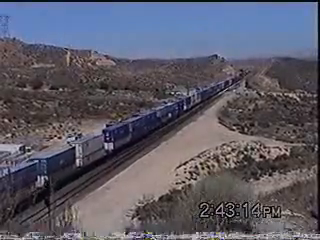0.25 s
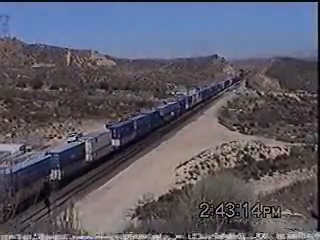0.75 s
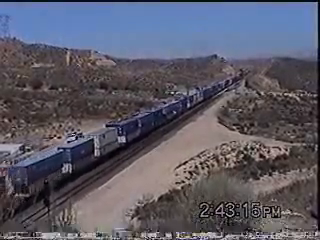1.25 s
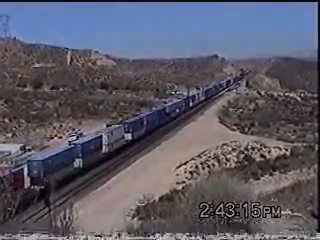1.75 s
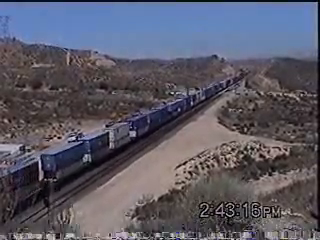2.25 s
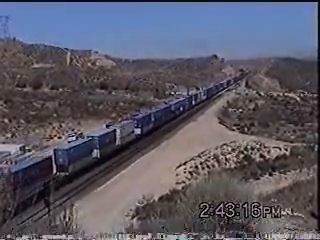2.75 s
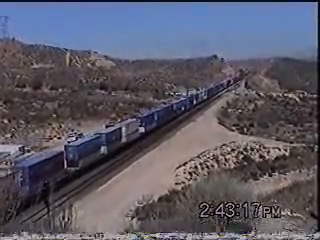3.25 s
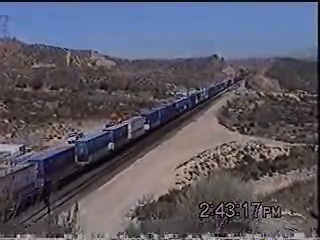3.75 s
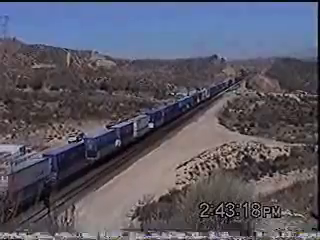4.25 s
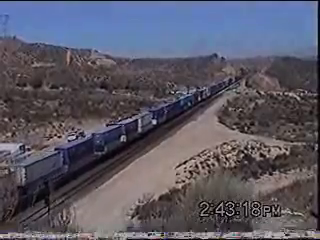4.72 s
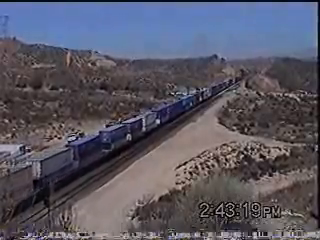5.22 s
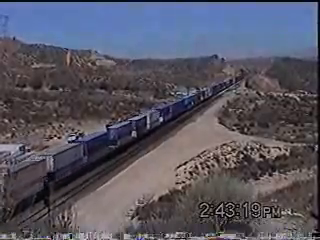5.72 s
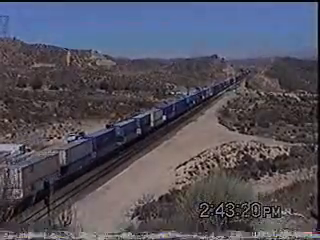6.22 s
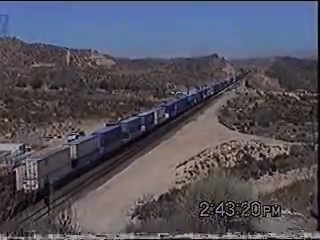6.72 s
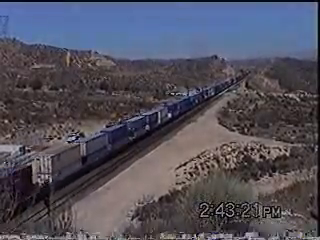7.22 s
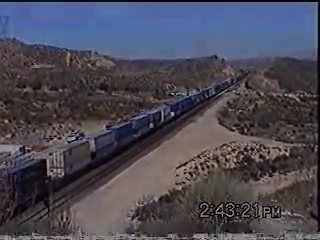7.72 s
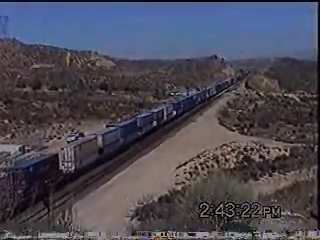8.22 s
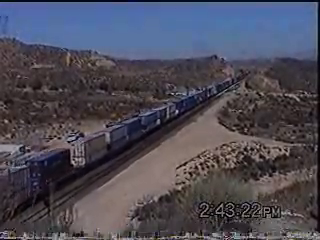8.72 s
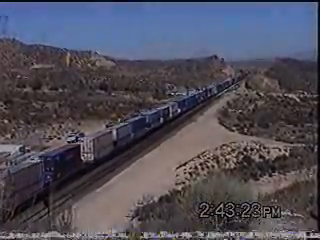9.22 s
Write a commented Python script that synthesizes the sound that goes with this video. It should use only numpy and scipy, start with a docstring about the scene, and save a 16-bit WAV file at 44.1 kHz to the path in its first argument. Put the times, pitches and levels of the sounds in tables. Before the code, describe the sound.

Outdoors on an open hillside, wind batters an unprotected camcorder microphone, with low thumps and distorted roaring gusts separated by lulls. Beneath it a long freight train below rolls by as a thin, fluctuating hiss. The first big gust comes within a second, another past four, then a long blast near six. Around seven seconds a flat wheel gives several bright metallic clanks, then choppy wind continues.

```python
"""Gusty wind buffets and rushes over a camcorder microphone while a long freight train hisses past below a
hillside; later a flat wheel clanks by. Wind is shaped noise on several scales of turbulence, with short eddy
bursts and a whistling grille on top; rolling is noise, and each clank a sum of decaying modes. The sound clips
at a ceiling that rises with its momentary, mostly treble, loudness; the loudest gusts hit full scale."""
import sys
import numpy as np
from scipy import signal
from scipy.fft import rfft, irfft, next_fast_len
from scipy.io import wavfile
from scipy.ndimage import uniform_filter1d, map_coordinates

SR = 44100
rng = np.random.default_rng(int(sys.argv[2]) if len(sys.argv) > 2 else 0)


def generate_wav(sig):
    """Save sig (samples, or channels by samples) to the path in sys.argv[1] as 16-bit PCM at SR."""
    pcm = np.round(np.clip(np.atleast_2d(sig).T, -1, 1) * 32767).astype(np.int16)
    wavfile.write(sys.argv[1], SR, pcm)


def attenuation_scalar(level_db):
    """Turn a level in dB into a linear amplitude multiplier (20 dB per decade)."""
    decades = np.asarray(level_db, float) / 20
    return 10 ** decades


N = 417627  # samples

# wind on the microphone: time_s, strength_db, small_eddies_share_db, finest_eddies_share_db
WIND_STRENGTH = [(0.0, -20, -4, -10), (0.45, -21, -4.5, -12), (0.55, -20.5, -4.5, -10.5),
                 (0.58, -17, -8, -14.5), (0.69, -10.5, -1.5, -6), (0.81, -2.5, -1, -4), (0.89, -12, -2, -1),
                 (0.97, -7, -3, -9), (1.05, -17, -4.5, -9.5), (1.13, -9, -9, -13), (1.16, -14, -6.5, -9.5),
                 (1.37, -19, -5, -10), (2.24, -22, -5, -12.5), (2.8, -18.5, -4, -6.5),
                 (3.08, -20, -6.5, -12), (3.35, -23, -5, -12), (3.88, -18.5, -6.5, -14.5),
                 (4.06, -22.5, -3, -8), (4.11, -14, -6, -14.5), (4.19, -17.5, -4, -7.5),
                 (4.33, -8.5, -4, -8), (4.61, -13, -3, -6.5), (4.64, -17, -3, -7), (4.75, -12, -2, -7.5),
                 (4.8, -20, -3, -7.5), (5.41, -22, -4, -10), (5.83, -15.5, -5, -12),
                 (5.85, -10.5, -1.5, -3.5), (5.96, -4, -4, -10.5), (6.04, -10, -3, -6.5),
                 (6.14, -5, -5, -13.5), (6.22, -6, -3.5, -8), (6.72, -13, -2, -9), (6.83, -16, -2, -8.5),
                 (6.86, -10, -3.5, -13), (7.02, -18, -2, -13), (7.59, -18, -3, -12), (7.86, -12.5, -4, -8),
                 (7.91, -10.5, -4, -3.5), (7.97, -13, -4, -9.5), (8.41, -11.5, -1, -9),
                 (8.49, -15.5, -2, -5.5), (8.86, -12, -1, -14.5), (9.47, -16, -2, -9)]
# brief lulls of the small eddies inside gusts: middle_s, depth_db, length_s
SMALL_EDDY_LULLS = [(0.715, -9, .018), (0.769, -5, .012), (0.913, -11.5, .018), (4.637, -2.5, .025),
                    (4.69, -5, .03), (5.887, -6.5, .025), (6.104, -5, .015), (6.546, -4, .025),
                    (6.826, -4, .025), (8.259, -4, .025)]
# deep buffeting of the diaphragm, relative spectrum: frequency_hz, density_db (per Hz)
BUFFET_SPECTRUM = [(15, -26.5), (25, -8), (50, -16.5), (85, -3.5), (130, -3), (200, -0.5), (280, -4.5),
                   (500, -44.5), (900, -120)]
# roar of the larger eddies, relative spectrum: frequency_hz, density_db (per Hz)
ROAR_SPECTRUM = [(60, -120), (130, -27.5), (230, -5), (330, -1), (450, -0.5), (600, -7), (900, -35),
                 (2500, -120)]
# rush of the small eddies, relative spectrum: frequency_hz, density_db (per Hz)
RUSH_SPECTRUM = [(200, -120), (400, -13), (650, -4.5), (1000, -2), (1700, -3.5), (2300, -15.5), (3500, -50),
                 (8000, -120)]
# fizz of the finest eddies, relative spectrum: frequency_hz, density_db (per Hz)
FIZZ_SPECTRUM = [(700, -120), (1500, -9.5), (2000, 2), (2600, -0.5), (3200, -7), (4200, -22), (8000, -120)]
# rolling noise of wheels on rails: time_s, top_octave_level_db
ROLLING_LEVEL = [(0.0, -42.5), (0.55, -44.5), (0.81, -47), (1.03, -41), (2.5, -42.5), (2.72, -36.5),
                 (3.08, -44), (3.85, -45), (4.43, -39), (5.19, -42), (5.8, -39), (5.85, -34), (5.88, -34),
                 (6.72, -38.5), (6.91, -34.5), (7.49, -40), (7.99, -35.5), (9.47, -34.5)]
# rolling noise, relative spectrum: frequency_hz, density_db (per Hz)
ROLLING_SPECTRUM = [(1200, -120), (2500, -3), (3400, -2.5), (4300, -6), (5500, -9), (7000, -15),
                    (9000, -18.5), (16000, -120)]
# the loudest eddies bursting on the diaphragm: middle_s, level_db, centre_hz, length_s
LOUD_EDDIES = [(.07, -19, 151, 0.031), (.214, -15, 154, 0.031), (.404, -16, 168, 0.05),
               (.586, -11.5, 218, 0.026), (.663, -17.5, 1010, 0.043), (.692, -11.5, 1070, 0.012),
               (.737, -7.5, 980, 0.012), (.81, -6.5, 783, 0.091), (.83, -18.5, 2000, .075),
               (.896, -12.5, 1320, .014), (.922, -11.5, 132, 0.067), (.953, -12, 1296, 0.032),
               (.985, -9, 900, 0.039), (.99, -21, 1930, 0.048), (1.133, -21, 250, 0.039),
               (1.413, -21.5, 113, 0.031), (1.58, -10.5, 126, 0.033), (1.721, -14, 161, .035),
               (2.957, -12.5, 116, 0.015), (3.786, -13.5, 186, 0.041), (4.132, -16.5, 407, 0.049),
               (4.307, -7.5, 770, 0.0037), (4.332, -8.5, 952, 0.026), (4.345, -5, 134, 0.032),
               (4.373, -12.5, 916, 0.0099), (4.421, -4, 1030, 0.0044), (4.459, -7, 1140, 0.0051),
               (4.505, -5, 312, 0.011), (4.508, -11.5, 1316, .018), (4.536, -14.5, 1600, .012),
               (4.602, -11.5, 1420, 0.015), (4.735, -16.5, 1400, 0.055), (4.74, -15, 140, 0.024),
               (5.809, -11, 1050, 0.0067), (5.863, -8, 1650, 0.004), (5.926, -7.5, 1073, .057),
               (5.958, -6, 473, 0.041), (5.967, -10, 1130, 0.029), (6.001, -5, 1160, .009),
               (6.05, -11.5, 960, 0.033), (6.093, -6, 820, .014), (6.148, -7.5, 306, 0.036),
               (6.2, -6, 835, 0.02), (6.277, -4.5, 812, 0.026), (6.345, -7.5, 1103, .05),
               (6.37, -12, 1445, 0.025), (6.45, -13, 450, 0.031), (6.486, -6.5, 1320, 0.0081),
               (6.51, -15, 413, .03), (6.572, -14.5, 1635, 0.041), (6.662, -11, 1080, 0.0068),
               (6.695, -11, 1440, 0.022), (6.845, -9.5, 955, .008), (6.853, -12.5, 366, 0.029),
               (6.865, -11.5, 1210, 0.019), (6.907, -6.5, 1157, 0.0086), (6.945, -8.5, 1003, 0.0085),
               (6.965, -12.5, 118, 0.025), (7.93, -14, 504, 0.027), (8.053, -13.5, 846, .0071),
               (8.121, -12.5, 1120, 0.038), (8.158, -7.5, 373, 0.016), (8.16, -13, 1145, .01),
               (8.216, -13, 943, 0.017), (8.284, -11, 1280, 0.014), (8.305, -12.5, 1270, .04),
               (8.356, -6, 1345, 0.0062), (8.42, -12, 490, .014), (8.636, -10, 1095, 0.0073),
               (8.722, -11, 1080, 0.036), (8.776, -14.5, 1190, 0.013), (8.845, -15, 900, .046),
               (8.921, -9, 1200, 0.0069), (8.987, -16, 890, .05), (9.09, -11, 930, 0.02),
               (9.315, -19, 787, 0.047)]
# short bright ticks: middle_s, level_db, centre_hz, length_s
BRIGHT_TICKS = [(.372, -38.5, 5940, 0.011), (4.72, -39, 6550, 0.049), (5.858, -24, 5300, 0.019),
                (6.70, -34, 4150, 0.12), (8.06, -26.5, 4220, 0.022)]
# the loudest gusts whistling in the grille: start_s, rms_db
GRILLE_WHISTLES = [(.783, -25), (.836, -17.5), (.877, -25.5), (4.3385, -16.5), (4.4, -26), (4.4812, -26),
                   (5.91, -18.5), (6.002, -24), (6.123, -21), (6.499, -30.5), (6.926, -31), (8.056, -27)]
# grille whistle, relative spectrum: frequency_hz, density_db (per Hz)
GRILLE_SPECTRUM = [(1500, -120), (2900, -13), (3700, 2), (4200, -2), (4600, -23), (7000, -120)]
# a flat wheel striking the rail: start_s, peak_db
WHEEL_CLANKS = [(2.3296, -23.5), (6.8565, -9.5), (6.925, -13), (7.0694, -11), (7.285, -17.5),
                (7.511, -23.5), (7.749, -31), (7.85, -30.5)]
# ringing modes of wheel and rail: frequency_hz, relative_level_db, t60_s
WHEEL_MODES = [(3460, -1, .2), (3880, -3, .2), (4880, 0, .3), (5730, -5, .25), (6050, -10, .15),
               (6340, -8, .2), (7250, -8, .2)]
# frequency response of the tape: frequency_hz, gain_db
TAPE_RESPONSE = [(20, 2.5), (5000, -0.5), (7000, -3), (7700, -14.5), (8300, -24.5), (9000, -88),
                 (22000, -120)]

REST_DB = -25  # wind strength about which the layers' growth is reckoned


def unit(x):
    """Normalization: scales x to rms 1."""
    return x / np.sqrt(np.mean(x ** 2) + 1e-20)


def along(points, hz):
    """Logarithmic frequency scale: interpolates (Hz, value) points on it."""
    f, v = np.transpose(points)
    return np.interp(np.log(hz + 1), np.log(f + 1), v)


def curves(rows):
    """Linear interpolation: one value per sample for each column after the time."""
    s, *cols = np.transpose(rows)
    return [np.interp(np.arange(N) / SR, s, c) for c in cols]


def wobble(rate):
    """Slow random modulation: a smooth curve through rate random knots a second."""
    knots = rng.standard_normal(int(N * rate / SR) + 4)
    return map_coordinates(knots, [np.arange(N) * rate / SR])


def running_rms(x, seconds):
    """Short-term loudness: the root of the power averaged over a sliding window."""
    power = uniform_filter1d(x ** 2, max(int(seconds * SR), 1))
    return np.sqrt(np.abs(power) + 1e-12)


def coloured(x, spectrum):
    """Linear filtering: multiplies the transform of x by a (Hz, dB) gain."""
    m = next_fast_len(N + 8192)
    gain = attenuation_scalar(along(spectrum, np.fft.rfftfreq(m, 1 / SR)))
    return irfft(rfft(x, m) * gain, m)[:N]


def turbulence(spectrum, patchy_db, centre_hz=None, hump_db=0, octaves=.5):
    """Turbulent noise: patches of random gain in time and pitch, an optional moving hump, steady rms 1."""
    hz, t, z = signal.stft(rng.standard_normal(N), SR, nperseg=512)
    field = uniform_filter1d(rng.standard_normal(z.shape), size=5, axis=0)
    field = uniform_filter1d(field, size=5, axis=1)
    gain_db = patchy_db * unit(field)
    if centre_hz is not None:
        centre = centre_hz[np.minimum((t * SR).astype(int), N - 1)]
        away = np.log2((hz[:, None] + 1) / centre)
        gain_db = gain_db + hump_db * np.exp(-.5 * (away / octaves) ** 2)
    patchy = signal.istft(z * attenuation_scalar(gain_db), SR, nperseg=512)[1][:N]
    x = coloured(patchy, spectrum)
    return x / running_rms(x, 0.19)


def buffet(roar_db, small_db):
    """Pressure buffeting: the deepest noise grows more slowly than the roar."""
    at_rest_db, grows, sinks = -27.5, 0.63, 0.6  # grows: dB per dB of roar; sinks: dB per dB of small share
    level_db = at_rest_db + grows * (roar_db - REST_DB) - sinks * small_db
    return attenuation_scalar(level_db + 1.8 * wobble(16)) * turbulence(BUFFET_SPECTRUM, patchy_db=0.2)


def roar(roar_db, flutter):
    """Large-eddy turbulence: low noise whose level flutters at random."""
    level_db = roar_db + 1.32 * flutter + 0.53 * wobble(14)
    return attenuation_scalar(level_db) * turbulence(ROAR_SPECTRUM, patchy_db=0.7)


def rush(rush_db, gusty, flutter, centre_hz):
    """Small-eddy turbulence: noise with a spectral hump that follows the eddy pitch."""
    level_db = rush_db + gusty * (0.3 * flutter + 0.82 * wobble(14))
    return attenuation_scalar(level_db) * turbulence(RUSH_SPECTRUM, patchy_db=0.5, centre_hz=centre_hz,
                                      hump_db=6.0, octaves=0.67)


def fizz(fizz_db, gusty, flutter):
    """Fine-scale turbulence: the finest eddies give the brighter noise."""
    level_db = fizz_db + gusty * (0.58 * flutter + 0.73 * wobble(14))
    return attenuation_scalar(level_db) * turbulence(FIZZ_SPECTRUM, patchy_db=1.1)


def rolling():
    """Rolling contact noise: the far train is heard as a fluctuating hiss."""
    top_octave_db, = curves(ROLLING_LEVEL)
    whole_db = top_octave_db + 6  # the whole hiss over its top octave
    return attenuation_scalar(whole_db + 0.91 * wobble(15)) * turbulence(ROLLING_SPECTRUM, patchy_db=1.0)


def eddies(rows, below, above):
    """Vortex shedding: flat-topped noise bands, each around its pitch, rising faster than they fade.
    below and above are the skirt widths in log frequency."""
    out = np.zeros(N + SR)
    n = SR // 8
    hz, t = np.fft.rfftfreq(n, 1 / SR), (np.arange(n) - n // 2) / SR
    for (s, db, centre, length), white in zip(rows, rng.standard_normal((len(rows), n))):
        away = np.log((hz + 1) / centre)
        skirt = np.exp(-.5 * (away / np.where(away < 0, below, above)) ** 2)
        band = irfft(rfft(white) * skirt, n)
        band /= running_rms(band, 3.4 / centre)  # a shedding vortex holds its strength
        band = unit(irfft(rfft(band) * np.sqrt(skirt), n))
        shape = np.exp(-np.abs(2.16 * t / length) ** np.where(t < 0, 6, 2.5))
        out[round(s * SR):][:n] += attenuation_scalar(db) * band * shape
    return out[n // 2:][:N]


def lesser_eddies(rush_db, centre_hz, count):
    """Random shedding: eddy rows are more frequent and stronger where the rush is strong."""
    over_rush_db, scatter_db = 0.9, 3.7
    typical_s, pitch_spread, length_spread = .011, 0.29, 0.2  # spreads in natural log
    place, size, pitch, life = rng.standard_normal((count, 4)).T
    shed = np.cumsum(attenuation_scalar(rush_db))
    due = (np.arange(count) + .5 + .5 * np.tanh(place)) / count
    at = np.minimum(np.searchsorted(shed / shed[-1], due), N - 1)
    level_db = rush_db[at] + over_rush_db + scatter_db * size
    pitch_hz = centre_hz[at] * np.exp(pitch_spread * pitch)
    return np.transpose([at / SR, level_db, pitch_hz, typical_s * np.exp(length_spread * life)])


def grille(strength_db):
    """Aeolian whistling: an unsteady narrow noise follows the wind, briefly loud in the strongest gusts."""
    t = np.arange(N) / SR
    rise_s, at_rest_db, grows = 0.014, -51, 1.08  # grows: dB per dB of strength
    blow = sum(attenuation_scalar(db) * np.exp(-((t - s - rise_s) / rise_s) ** 2) for s, db in GRILLE_WHISTLES)
    unsteady_db = at_rest_db + grows * (strength_db - REST_DB) + 2.6 * wobble(30)
    return (blow + attenuation_scalar(unsteady_db)) * turbulence(GRILLE_SPECTRUM, patchy_db=4)


def wind():
    """Turbulent cascade: strength and eddy size drive four scales of noise, with eddy bursts on top."""
    strength_db, small_db, finest_db = curves(WIND_STRENGTH)
    # steady turbulence rises less than the strength: in gusts the bursts carry more
    steady_db = REST_DB + .85 * (strength_db - REST_DB)
    t = np.arange(N) / SR
    lull_db = sum(db * np.exp(-(2 * (t - s) / length) ** 4) for s, db, length in SMALL_EDDY_LULLS)
    small_db = np.minimum(small_db, -.4)  # leaves some power to the large eddies
    rush_db = steady_db + small_db - 0.11 + lull_db
    large_db = 10 * np.log10(1 - attenuation_scalar(2 * small_db))  # the remaining share of the power
    roar_db = steady_db + large_db - 0.85
    fizz_db = REST_DB + 0.79 * (strength_db - REST_DB) + finest_db + 0.3 + lull_db
    # 1190 Hz when all eddies are small; the pitch sinks with their share
    centre_hz = 1190 * 2 ** (0.21 * small_db + 0.04 * wobble(13))
    flutter = wobble(35)
    gusty = np.clip((rush_db + 29.0) / 15, 0, 1)  # strong wind flutters more
    steady = buffet(roar_db, small_db) + roar(roar_db, flutter)
    steady = steady + rush(rush_db, gusty, flutter, centre_hz) + fizz(fizz_db, gusty, flutter)
    loud = eddies(LOUD_EDDIES, below=.56, above=.55)
    lesser = eddies(lesser_eddies(rush_db, centre_hz, count=90), below=0.44, above=0.39)
    ticks = eddies(BRIGHT_TICKS, below=.1, above=.18)
    return steady + loud + lesser + ticks + grille(strength_db)


def clanks():
    """Modal ringing: each blow excites decaying modes of wheel and rail, smeared by distance."""
    out, t = np.zeros(N + SR), np.arange(SR // 3) / SR
    for s, db in WHEEL_CLANKS:
        mode_db = rng.normal(0, 2.5, len(WHEEL_MODES))
        # echoes blur each mode's phase
        wander = np.cumsum(rng.normal(0, .07, (len(WHEEL_MODES), len(t))), axis=1)
        ring = sum(attenuation_scalar(level + more - 60 * t / t60) * np.sin(2 * np.pi * hz * t + phase)
                   for (hz, level, t60), more, phase in zip(WHEEL_MODES, mode_db, wander))
        scrape = 2.1 * attenuation_scalar(-60 * t / .25) * np.diff(rng.standard_normal(len(t) + 1))
        clank = (1 - np.exp(-t / 0.0073)) * (ring + scrape)  # softened onset
        out[round(s * SR):][:len(t)] += attenuation_scalar(db) * clank / np.abs(clank).max()
    return out[:N]


def train():
    """Superposition: the far rolling hiss and the clanks of the flat wheel add."""
    return rolling() + clanks()


def scene():
    """Superposition: wind and train add at one microphone."""
    return (wind() + train())[None]


def rising_ceiling(x):
    """Saturation: x clips at a ceiling which rises with its momentary loudness."""
    rest, knee = 1 / 3, 14  # resting ceiling as a part of full scale; sharpness of the bend
    heard = x - 0.43 * uniform_filter1d(x, size=60)  # the ceiling follows mostly the treble
    lifted = 1.85 * running_rms(heard, .005)
    ceiling = (rest ** knee + lifted ** knee) ** (1 / knee)  # close to the larger of the two
    return x / (1 + np.abs(x / ceiling) ** knee) ** (1 / knee)


def playback_stage(x):
    """Soft saturation: the playback stage rounds the tallest peaks."""
    return x / (1 + np.abs(x / 1.2) ** 4) ** (1 / 4)


def band_limit(x):
    """A steep low-pass at the top of the band."""
    return signal.sosfilt(signal.butter(12, 8250, fs=SR, output="sos"), x)


def record(dry):
    """Nonlinear and linear distortion in series: rising ceiling, rounding, treble loss, full-scale clipping."""
    x = playback_stage(rising_ceiling(dry[0]))
    mix = np.clip(coloured(x, TAPE_RESPONSE), -1, 1)
    return band_limit(mix[None])


dry = scene()
out = record(dry)
generate_wav(out)
```